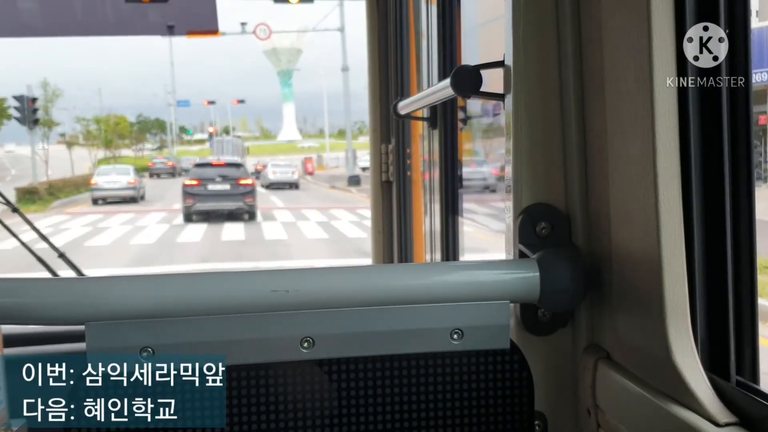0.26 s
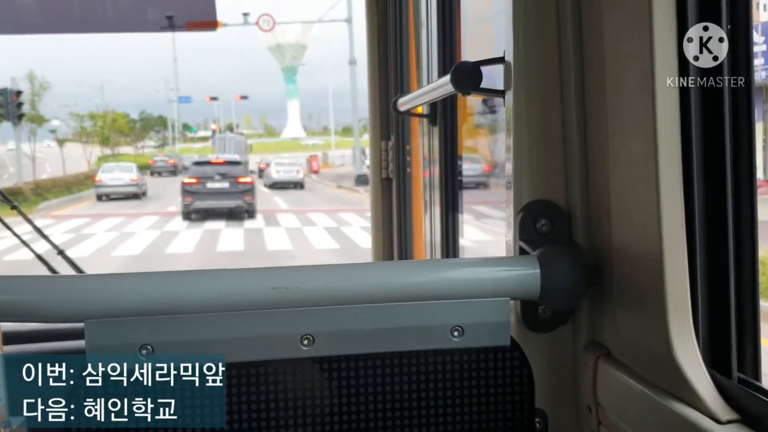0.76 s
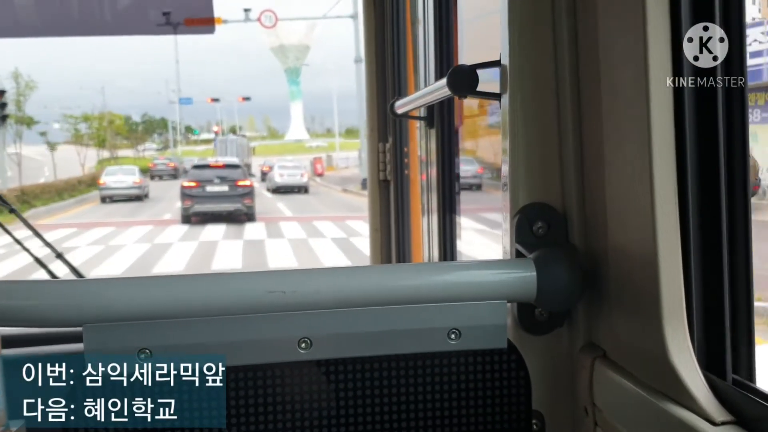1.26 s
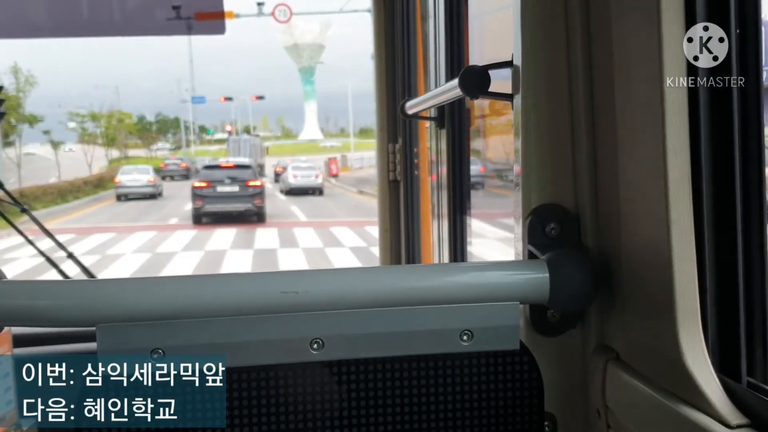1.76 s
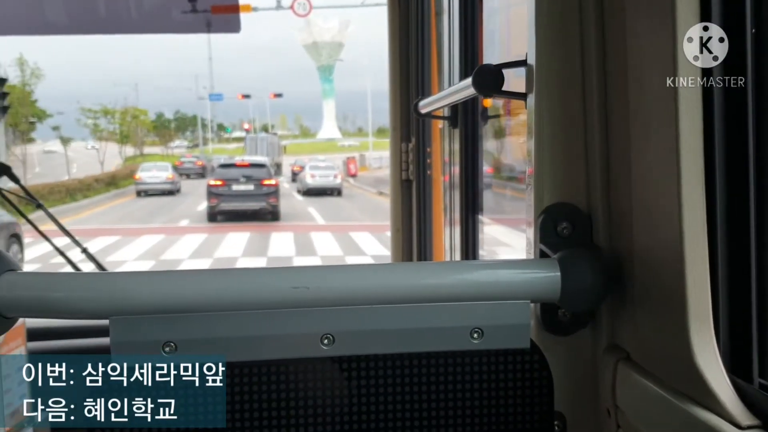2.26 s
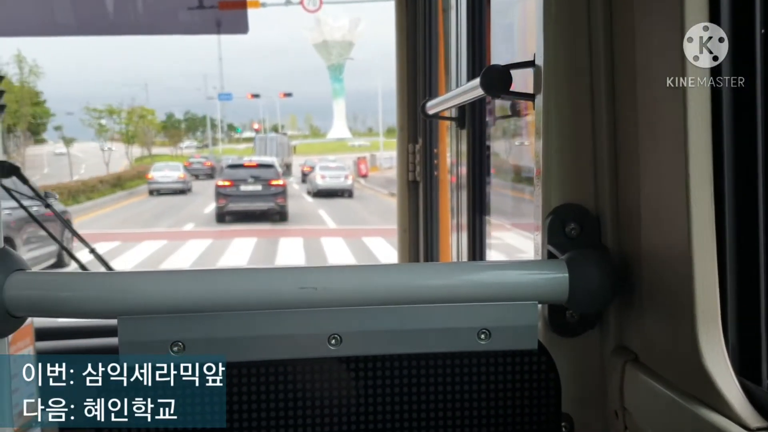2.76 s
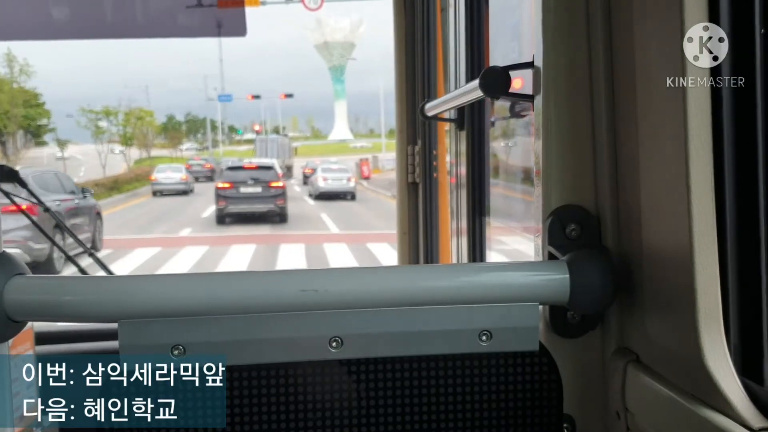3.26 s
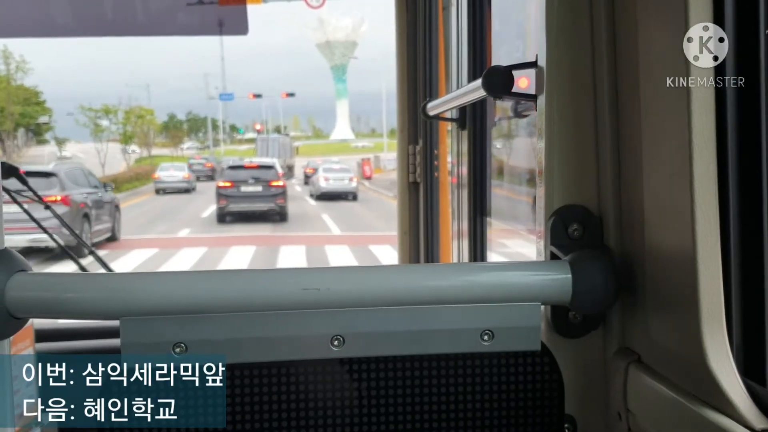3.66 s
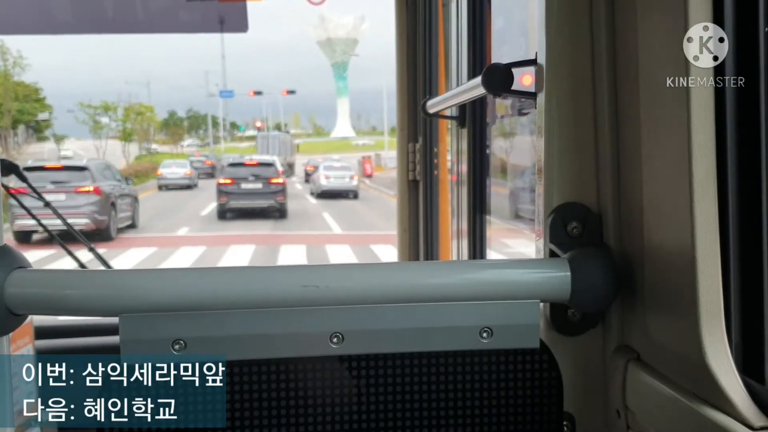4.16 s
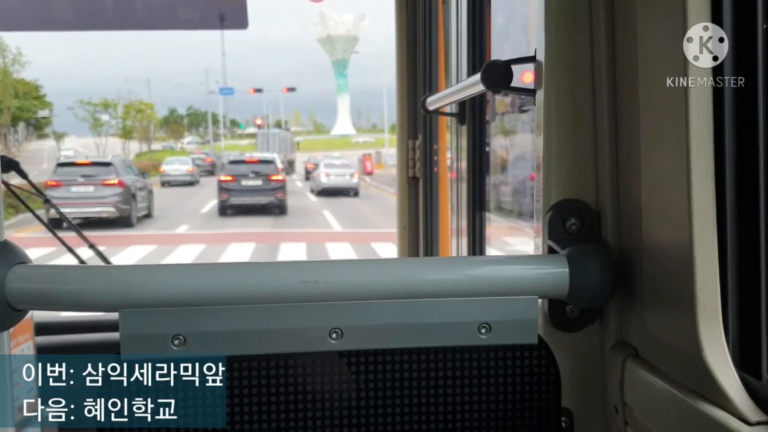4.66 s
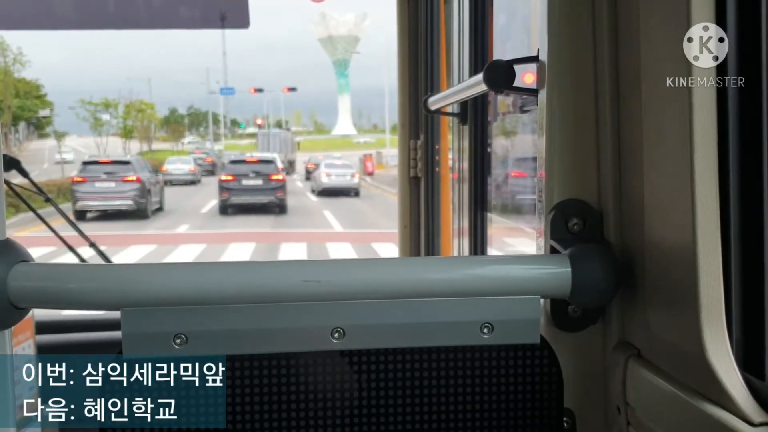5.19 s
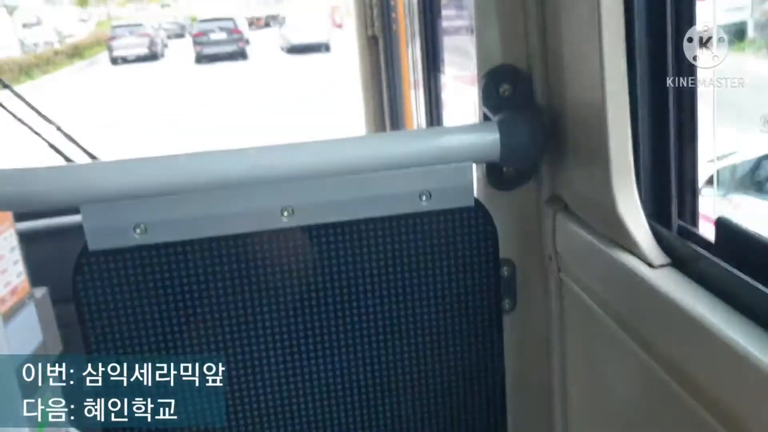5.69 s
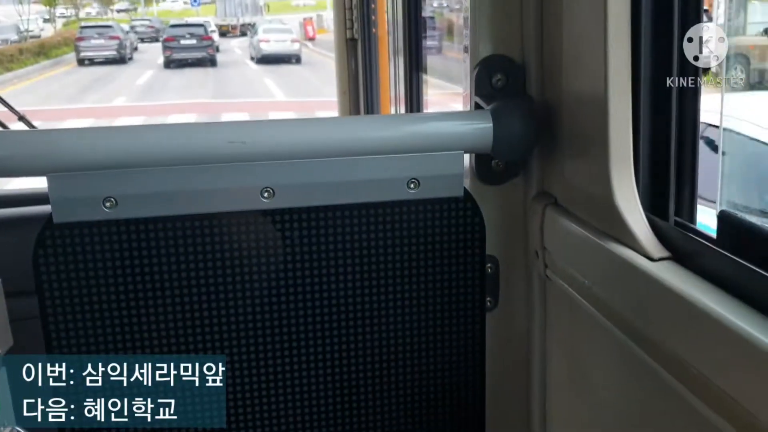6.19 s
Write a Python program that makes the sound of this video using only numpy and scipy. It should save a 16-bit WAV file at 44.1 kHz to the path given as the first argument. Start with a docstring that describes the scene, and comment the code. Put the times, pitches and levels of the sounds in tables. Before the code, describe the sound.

Inside a slowing city bus, diesel hum and road rumble sink under fluttering brake squeals, then a loud burst of brake air hisses out.

```python
"""The brake air of a city bus is let off in one loud hiss, heard inside near the front door.
Coloured noise makes the hiss, with a leak before it, a puff after it and narrow resonances of the outlet.
Before it the diesel, a sum of sines, sinks to a low hum under road noise that falls as the bus slows.
The brakes sing as fluttering tones, the body thumps with damped rings, and puffs of noise make the spits.
A soft draught of ventilation, noise with a thin fan whine, is left at the end."""
import sys
import numpy as np
from scipy import signal
from scipy.fft import rfft, irfft
from scipy.io import wavfile
from scipy.ndimage import uniform_filter1d

SR = 44100
rng = np.random.default_rng(int(sys.argv[2]) if len(sys.argv) > 2 else 0)


def persist_wave(psi):
    """Save psi, clipped to +-1, as 16-bit WAV."""
    counts = np.round(np.clip(psi, -1, 1) * 32767).astype(np.int16)
    wavfile.write(sys.argv[1], SR, np.atleast_2d(counts).T)


N = 283666  # length in samples
TIME = np.arange(N) / SR  # seconds
HZ = np.fft.rfftfreq(N, 1 / SR)
TOP_HZ = 15400  # upper edge of the treble


def amp(db):
    """Turns decibels into a gain."""
    return 10 ** (np.asarray(db) / 20)


def unit(x):
    """Scales a sound to an rms (average strength) of one."""
    return x / np.sqrt(np.mean(x ** 2) + 1e-20)


def curve(rows, column=1):
    """Joins one column of a table by straight lines in time."""
    rows = np.array(rows)
    return np.interp(TIME, rows[:, 0], rows[:, column])


def read(points):
    """Joins the points of a spectrum by straight lines on a log-frequency axis."""
    hz, value = np.transpose(points)
    return np.interp(np.log(HZ + 1), np.log(hz + 1), value)


def add(mix, s, sound):
    """Mixes a sound in at time s (seconds), cut off at the end of the mix."""
    part = mix[..., round(s * SR):][..., :sound.shape[-1]]
    part += sound[..., :part.shape[-1]]


def swell(t, rise, t60):
    """Rises in a straight line, then dies away by 60 dB every t60 seconds."""
    return np.minimum(t / rise, 1) * amp(-60 * np.maximum(t - rise, 0) / t60)


def held(s, length, rise_db_per_s, sag_db_per_s, fall_db_per_s, hold=0, easing=np.inf):
    """Builds to one at time s, holds, sags, and falls away once its length has passed from s."""
    t = TIME - s
    sagging = np.maximum(t - hold, 0)
    rise_db = rise_db_per_s * np.minimum(t, 0)
    sag_db = sag_db_per_s * sagging / (1 + sagging / easing)
    fall_db = fall_db_per_s * np.maximum(t - length, 0)
    return amp(np.maximum(rise_db - sag_db - fall_db, -200))


def wander(rate):
    """Drifts by chance with an rms of one, up to about rate changes a second."""
    return unit(irfft(rfft(rng.standard_normal(N)) * np.exp(-(HZ / rate) ** 2), N))


def air_pair(spacing_m=0.17):
    """Sound from all sides at two microphones: alike in the bass, unrelated in the treble."""
    # How the two sides differ. Each row: frequency in Hz, left minus right in dB.
    side_lean = [(60, -3), (200, -1), (380, -7.5), (700, 1), (1290, -0.5), (2380, -5), (4400, -3),
                 (8120, -2.5), (15000, -4)]
    a, b = rfft(rng.standard_normal((2, N)))
    sound_speed = 343  # metres per second
    same = np.minimum(np.sinc(2 * HZ * spacing_m / sound_speed), .96)
    lean = amp(read(side_lean) / 2)
    left = a * lean
    right = (same * a + np.sqrt(1 - same ** 2) * b) / lean
    return np.array([left, right])


def noise(spectrum_db):
    """Makes stereo noise of a given colour; the average of its two sides has an rms of one."""
    x = irfft(air_pair() * amp(spectrum_db), N)
    return x / x.mean(0).std()


def cabin(x, t60, wet_db):
    """Adds dense short reflections from windows and panels, different at each microphone."""
    t = np.arange(SR // 3) / SR
    tail = rng.standard_normal((2, len(t))) * amp(-60 * t / t60) * (t > .003)
    tail /= np.linalg.norm(tail, axis=1, keepdims=True)
    return x + amp(wet_db) * signal.fftconvolve(np.atleast_2d(x), tail, axes=1)[:, :N]


def ventilation(level_db=-52):
    """A soft draught of coloured noise with the thin, unsteady whine of its fan sets in late."""
    # Colour of the draught. Each row: frequency in Hz, relative level in dB.
    draught_colour = [(900, -24), (1700, -17), (2100, 4.5), (2600, 5.5), (3000, 0), (3400, 6.5),
                      (4500, -5.5), (6800, -3.5), (8500, -8.5), (10000, -9), (11000, -7), (15500, -10)]
    # Whine of the fan. Each row: frequency in Hz, level in dB against the draught.
    fan_lines = [(2632, -12), (3311, -14.5), (9970, -17)]
    whine = 0
    for hz, db in fan_lines:
        turns = np.cumsum(hz * (1 + 0.0019 * wander(40))) / SR
        whine = whine + amp(db) * unit(np.sin(2 * np.pi * turns))
    # with no fall, the length has no effect
    level = held(5.32, length=1.0, rise_db_per_s=93, sag_db_per_s=4.5, fall_db_per_s=0)
    return (noise(read(draught_colour)) + whine) * amp(level_db) * level


def road(rumble_db=-31.0, roar_db=-40.0, rush_db=1, jolt_db=1.5, grit_db=1.06):
    """Body rumble, tyre roar and rushing air all fall, unevenly, as the bus slows."""
    # Road noise over time. Each row: time in seconds, relative level in dB.
    road_level = [(0, 0.5), (.75, -2.5), (1.6, -7), (2.4, -6.5), (2.8, -9), (4.4, -7.5), (5.0, -11.5),
                  (5.55, -9.5), (5.85, -17), (6.43, -14)]
    # Level of the thin rush of air. Each row: time in seconds, relative level in dB.
    rush_level = [(0, -53.5), (1.1, -57), (2.9, -61.5), (3.35, -60), (3.7, -60), (4.4, -56), (5.3, -64),
                  (6.43, -62)]
    # Colours of body rumble, tyre roar and rushing air. Each row: frequency in Hz, relative level in dB.
    rumble_colour = [(12, -25), (24, -60), (36, 7), (46, -18), (72, 7), (92, -3), (115, 3), (138, -7),
                     (195, -5.5), (290, -12.5), (400, -26), (600, -24.5), (1200, -79)]
    roar_colour = [(150, -12.5), (330, -1), (440, -6), (530, 1), (600, -1), (700, 1), (900, 0.5),
                   (1200, -4.5), (1700, -6), (2500, -15), (3500, -24.5), (6000, -71), (15000, -46)]
    rush_colour = [(1000, 8), (2500, 9), (4200, 3.5), (5400, 2.5), (6800, 4), (8500, -2), (11300, -0.5),
                   (13000, -5), (15500, -18)]
    rumble_follows = 0.63  # share of the road's dB changes that the rumble follows
    rumble_level_db = rumble_follows * curve(road_level) + rumble_db + jolt_db * wander(15.0)
    rumble = noise(read(rumble_colour)) * amp(rumble_level_db)
    roar = noise(read(roar_colour)) * amp(curve(road_level) + roar_db + grit_db * wander(33))
    rush = noise(read(rush_colour)) * amp(curve(rush_level) + rush_db)
    return rumble + roar + cabin(rush, t60=0.071, wet_db=-5.0)


def engine(unsteady=0.0036, throb_db=1.0, boom_hz=62.9, boom_db=-31):
    """Low orders of the diesel come through the floor, throbbing a little, over an early body boom."""
    # The diesel over time. Each row: time in seconds, crankshaft turns per second, relative level in dB.
    diesel = [(0, 9.4, -42), (.5, 9.94, -26.5), (.9, 9.2, -32), (1.5, 8.33, -32.5), (2.7, 8.6, -34.5),
              (3.3, 9.5, -33), (3.7, 9, -40), (4.3, 9.28, -37), (5.0, 9.9, -38.5), (5.8, 8.7, -42.5),
              (6.43, 10.8, -42)]
    # Six cylinders fire at order 3; the fractions are belt-driven parts.
    # Each row: multiple of the crankshaft rate, relative level in dB.
    orders = [(3, -31), (4, -14), (6, -3), (8, -4), (10.67, -11.5), (11.67, -9.5), (12, -12.5),
              (16.4, -16.5), (24, -17)]
    turns = np.cumsum(curve(diesel) * (1 + unsteady * wander(5.37))) / SR
    hum = 0
    for order, db in orders:
        tone = np.sin(2 * np.pi * (order * turns + rng.random()))
        hum = hum + amp(db + throb_db * wander(2.6)) * tone
    booming = held(0.21, length=1.5, rise_db_per_s=82, sag_db_per_s=1.0, fall_db_per_s=50)
    boom = booming * amp(boom_db + throb_db * wander(5.2)) * np.sin(2 * np.pi * boom_hz * TIME)
    # the right side is 2 dB louder
    return (hum * amp(curve(diesel, column=2)) + boom) * amp([[-1], [1]])


def thumps(level_db=0.5, tone=0.47, shudder=0.6, spread=0.46, top_hz=540):
    """A bump pushes one damped panel and shakes those around it; the lining dulls the knock."""
    # Bumps of the body panels. Each row: start in seconds, relative level in dB, centre in Hz,
    # time to die by 60 dB in seconds, rise in seconds.
    bumps = [(.02, -31.5, 181.2, 1.0, .02), (0.551, -23, 171, 0.13, 0.0052), (0.624, -26, 258.4, 0.2, 0.01),
             (.67, -25, 170, 0.24, 0.0071), (1.07, -36, 318, 0.094, .004), (1.695, -34, 323, 0.16, .003),
             (2.163, -29.5, 340, .07, 0.0045), (2.452, -30.5, 368, 0.083, 0.0018),
             (3.67, -33, 347, 0.06, 0.0023), (3.72, -33.5, 290, 0.086, 0.0027),
             (4.53, -26, 76.7, 0.5, 0.044), (4.629, -19, 227, 0.077, .005),
             (4.657, -19.5, 301, 0.1, 0.0038), (4.667, -13.5, 200, 0.074, 0.01),
             (5.209, -25, 175, 0.19, 0.014), (5.744, -29.5, 132.5, 0.11, 0.0099),
             (6.09, -41.5, 253, 0.26, 0.011), (6.195, -30.5, 187.6, 0.37, 0.014),
             (6.201, -40, 347, 0.56, .006), (6.223, -28, 80, 0.16, 0.011)]
    out, t = np.zeros(N), np.arange(SR) / SR
    f = np.fft.rfftfreq(len(t), 1 / SR)
    for s, db, hz, t60, rise in bumps:
        near = np.exp(-.5 * (np.log2((f + 1) / hz) / spread) ** 2)  # spread in octaves
        lining = 1 / (1 + (f / top_hz) ** 6)
        panels = unit(irfft(rfft(rng.standard_normal(len(t))) * near * lining, len(t)))
        ring = tone * np.sin(2 * np.pi * hz * t) + shudder * panels
        add(out, s, ring * amp(db) * swell(t, rise, t60))
    panned = out * amp(level_db) * amp([[-1.2], [1.2]])
    return cabin(panned, t60=0.082, wet_db=-10)


def squeaks(waver=0.0087):
    """Short, unsteady sine tones swell and fade, from thin brake squeaks to low groans."""
    # Each row: start in seconds, length in seconds, average pitch in Hz, level in dB.
    tones = [(.39, .11, 14250, -62), (0.437, .16, 8680, -68), (.68, .1, 14200, -68),
             (0.904, 0.099, 4150, -59), (1.6, .1, 8680, -71), (4.303, 0.14, 9270, -74),
             (5.479, 0.088, 103.3, -29.5), (5.514, 0.08, 518, -42), (5.59, 0.091, 524, -52.5),
             (6.089, 0.062, 460, -49.5)]
    out = np.zeros(N)
    for s, length, hz, db in tones:
        size = int(length * SR)
        turns = np.cumsum(hz * (1 + waver * wander(120)[:size])) / SR
        tone = unit(np.sin(2 * np.pi * turns))
        add(out, s, amp(db) * tone * signal.windows.tukey(size, .7))
    return out


def grabs(note):
    """The level of one brake note builds at each grab of the pad and dies when the pad lets go."""
    # Each grab of a brake pad. Each row: time the note is fully built in seconds,
    # length in seconds from then until the pad lets go, relative level in dB, note.
    pad_grabs = [(0.036, 0.22, -55.5, "high"), (0.426, 0.41, -57.5, "high"), (.895, 0.021, -55.5, "high"),
                 (0.974, 0.12, -57, "high"), (1.238, .36, -56.5, "high"), (2.389, 0.12, -46.5, "low"),
                 (2.573, 0.025, -37.5, "low"), (2.653, .025, -42, "low"), (2.745, .23, -48, "low"),
                 (3.043, 0.034, -45, "low"), (3.125, 0.05, -46.5, "low"), (3.24, .02, -51, "low"),
                 (3.327, 0.032, -39, "low"), (3.417, .06, -44.5, "low"), (3.551, 0.066, -42, "low"),
                 (3.683, 0.012, -47, "low"), (3.79, 0.074, -63.5, "low")]
    build_db_per_s, sag_db_per_s, let_go_db_per_s = 330, 7, 246
    levels = [amp(db) * held(s, length, build_db_per_s, sag_db_per_s, let_go_db_per_s)
              for s, length, db, name in pad_grabs if name == note]
    return np.max(levels, axis=0)


def squeal(level, pitch_hz, jitter_hz, flutter, lean_db, rasp_db):
    """One brake mode is rubbed into song; scattered paths make it flutter, rubbing adds a narrow rasp."""
    turn = np.exp(2j * np.pi * np.cumsum(pitch_hz + jitter_hz * wander(28)) / SR)
    paths = np.array([1 + flutter * (wander(50) + 1j * wander(52)) for _ in range(2)])
    rasp = np.array([wander(88) + 1j * wander(120) for _ in range(2)])
    rubbing = np.sqrt(level * abs(uniform_filter1d(level, size=SR // 3)))  # steadier than the tone
    song = unit((turn * paths).real) * level
    scrape = amp(rasp_db) * unit((turn * rasp).real) * rubbing
    return (song + scrape) * amp([[lean_db / 2], [-lean_db / 2]])


def brake_song():
    """Two high notes sound together at the same grabs; a low note creeps upward as the brake works."""
    high_level = grabs("high")
    high = squeal(high_level, pitch_hz=9660, jitter_hz=3, flutter=0.27, lean_db=-6.0, rasp_db=-6)
    higher = squeal(high_level, pitch_hz=11660, jitter_hz=25, flutter=.5, lean_db=-4, rasp_db=1)
    low_hz = 5897 + 8 * (TIME - 2.4)  # 5897 Hz at 2.4 s, creeping 8 Hz per second
    low = squeal(grabs("low"), low_hz, jitter_hz=3.5, flutter=.27, lean_db=-1, rasp_db=-9)
    return high + amp(-15) * higher + amp(1.5) * low


def spits(level_db=3):
    """Each puff of noise, centred on its own pitch, rises quickly and dies away."""
    # Short spits of air and scuffs around the brakes and door. Each row: start in seconds,
    # relative level in dB, rise in seconds, time to die by 60 dB in seconds, centre in Hz, width in octaves.
    puffs = [(.629, -41, 0.0054, 0.046, 11500, .4), (0.641, -39, 0.0014, 0.014, 12000, 0.3),
             (0.634, -43, 0.0043, 0.51, 6750, 2.8), (.91, -53.5, 0.029, .5, 4150, 0.12),
             (1.58, -56, 0.0089, 0.36, 5500, 0.65), (2.06, -49, 0.013, 0.36, 11000, 0.18),
             (2.065, -53, 0.014, 0.69, 6000, 0.79), (2.32, -52.5, 0.01, 0.3, 3500, 0.91),
             (2.382, -46.5, 0.0076, 0.18, 2000, 0.64), (3.04, -62, .02, .6, 6500, 0.55),
             (3.439, -47.5, 0.063, 1, 2826, 1), (5.386, -41, 0.038, 0.81, 6650, 0.23),
             (5.481, -43, 0.031, 0.3, 11800, 0.087), (6.09, -46.5, 0.029, 0.23, 900, 0.74),
             (6.2, -46.5, 0.015, 0.42, 1260, 0.82), (6.2, -57, .01, .4, 11500, 0.3)]
    out, t = np.zeros((2, N)), np.arange(SR // 2) / SR
    air = irfft(air_pair(), N)
    octave = np.log2(np.fft.rfftfreq(len(t), 1 / SR) + 1)
    for s, db, rise, t60, hz, width in puffs:
        puff = air[:, rng.integers(N - len(t)):][:, :len(t)]
        band = np.exp(-.5 * ((octave - np.log2(hz)) / width) ** 2)
        puff = unit(irfft(rfft(puff) * band, len(t)))
        add(out, s, puff * amp(db + level_db) * swell(t, rise, t60))
    return out


def flow(part, sag_share, open_share=1, lag_s=0):
    """The air driving the jet or port builds at each release, sags with the pressure and is shut off."""
    # Openings of the air valve: a leak, the dump and a last puff. Each row: time fully open in seconds
    # (before any lag), length in seconds from then until it shuts, relative jet level in dB,
    # relative port level in dB, opening in dB per second and sag in dB per second,
    # both before their share is applied.
    releases = [(4.471, 0.089, -21.5, -31, 400, -1), (4.662, 0.62, -1, -0.5, 169, 38.5),
                (5.395, .2, -18.5, -19.5, 240, 18)]
    # full pressure holds for a moment; the sag is fast at first, then slower
    full_pressure_s, shut_db_per_s, sag_easing_s = 0.07, 108, 0.73
    levels = []
    for s, length, jet_db, port_db, opening, sag in releases:
        shape = held(s + lag_s, length, open_share * opening, sag_share * sag,
                     shut_db_per_s, full_pressure_s, sag_easing_s)
        levels.append(amp(jet_db if part == "jet" else port_db) * shape)
    return np.max(levels, axis=0)


def air_dump(jet_db=-24.0, port_db=-27, fizz_db=-33, hollow_db=-32, sputter_db=0.5, hollow_hz=1620,
             hollow_width_hz=230, hollow_power=1.61, fizz_hz=11300, fizz_width_hz=1950):
    """A wide jet and duller port ringing die with the pressure; a fizz lingers, a hollow note comes late."""
    # Colours of the jet and the port. Each row: frequency in Hz, relative level in dB.
    jet_colour = [(200, -6), (450, -8.5), (800, 1), (1200, -1), (2000, -6), (4100, 3), (5000, 2.5),
                  (7500, 4.5), (9500, -1), (11500, 2.5), (13000, -3), (15500, -2.5)]
    port_colour = [(500, -39), (1250, -35), (1600, -11.5), (2000, -2), (2700, 0), (3200, -1), (3700, -7),
                   (5000, -11.5), (9000, -46)]
    # Narrow resonances of the air outlet. Each row: frequency in Hz, width in Hz, lift in dB.
    outlet = [(1482, 10.4, 4), (1540, 18, 12), (1720, 29, 7), (1876, 23, 6.5), (2250, 43, 4),
              (2520, 21.3, 3.5), (2510, 44, 3), (2764, 40, 5.5), (3250, 55, 4), (4020, 30, 6),
              (5600, 40, 5)]
    lift_db = sum(db / (1 + (2 * (HZ - hz) / width) ** 2) for hz, width, db in outlet)
    # the crack of air as the valve snaps wide open
    crack_s, crack_length_s, crack_db = 4.654, 0.007, 6.5
    crack = amp(crack_db * np.exp(-((TIME - crack_s) / crack_length_s) ** 2))
    jet = noise(read(jet_colour) + lift_db) * amp(jet_db) * flow("jet", sag_share=1.47)
    fizz_colour = -10 * np.log10(1 + ((HZ - fizz_hz) / fizz_width_hz) ** 4)
    fizz = noise(fizz_colour) * amp(fizz_db) * flow("jet", sag_share=0.71)
    port_flow = flow("port", sag_share=1.39, open_share=1.76)
    port = noise(read(port_colour) + lift_db) * amp(port_db) * port_flow
    hollow_colour = lift_db - 10 * np.log10(1 + ((HZ - hollow_hz) / hollow_width_hz) ** 4)
    hollow_flow = flow("port", sag_share=1.26, open_share=0.49, lag_s=0.094)
    hollow = noise(hollow_colour) * amp(hollow_db) * hollow_flow ** hollow_power
    sputter = amp(sputter_db * wander(90))
    return cabin((jet + fizz + port + hollow) * crack * sputter, t60=0.055, wet_db=-10.5)


def scene():
    """Adds up everything that reaches a front seat."""
    background = ventilation() + road() + engine() + thumps()
    return background + squeaks() + brake_song() + spits() + air_dump()


def record(dry):
    """Removes the treble above TOP_HZ with a steep low-pass filter."""
    low_pass = signal.firwin(511, TOP_HZ, window=("kaiser", 9), fs=SR)
    return signal.oaconvolve(dry, low_pass[None], "same")


dry = scene()
out = record(dry)
persist_wave(out)
```